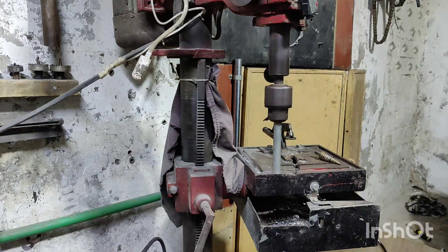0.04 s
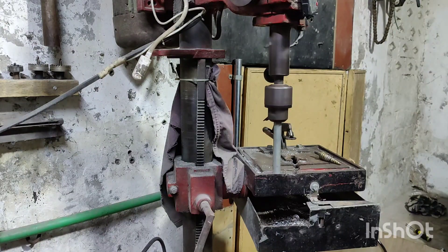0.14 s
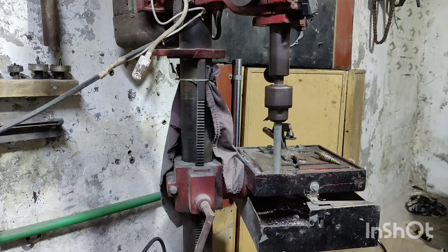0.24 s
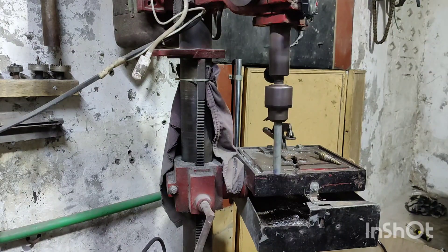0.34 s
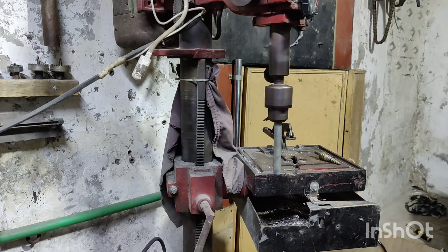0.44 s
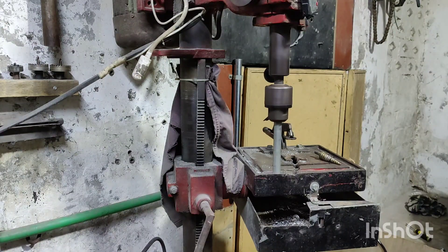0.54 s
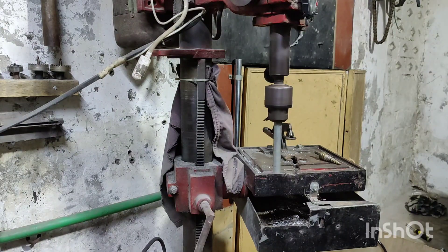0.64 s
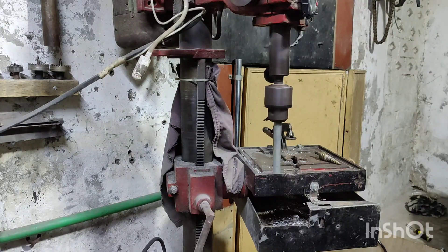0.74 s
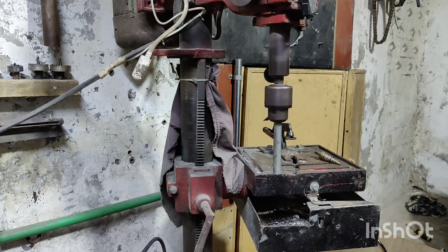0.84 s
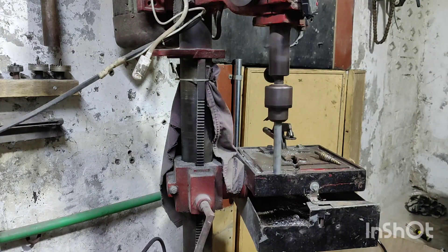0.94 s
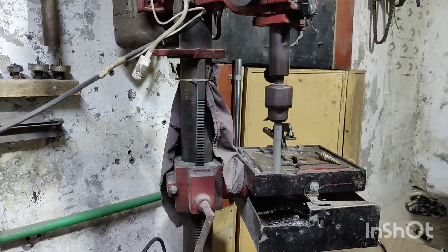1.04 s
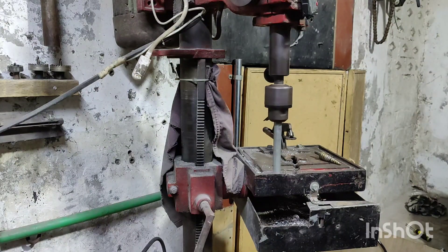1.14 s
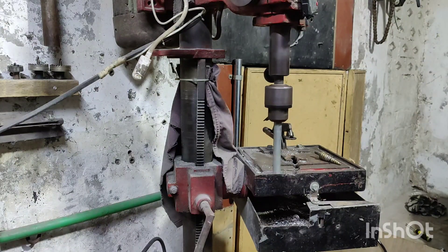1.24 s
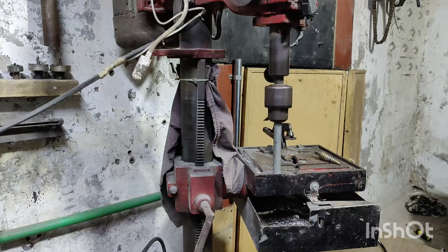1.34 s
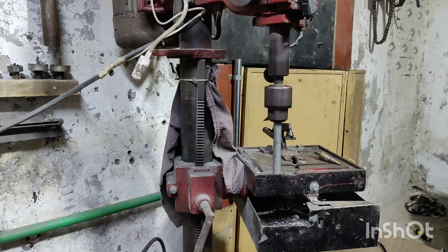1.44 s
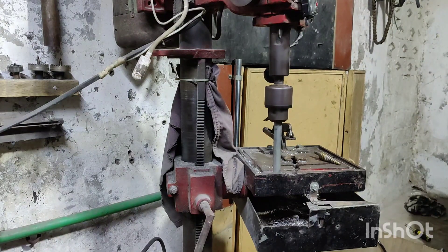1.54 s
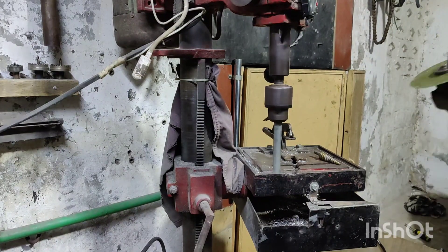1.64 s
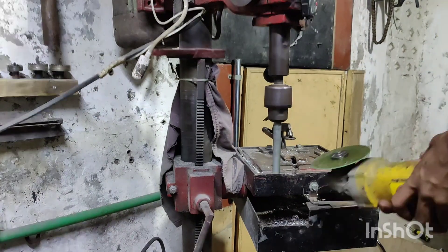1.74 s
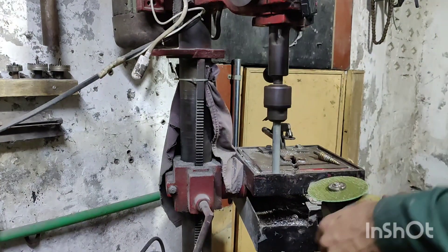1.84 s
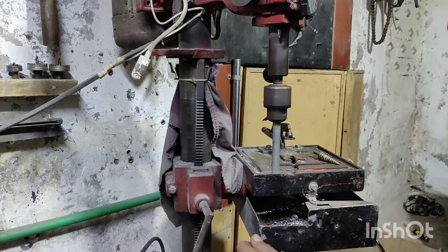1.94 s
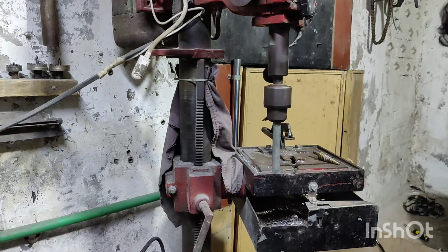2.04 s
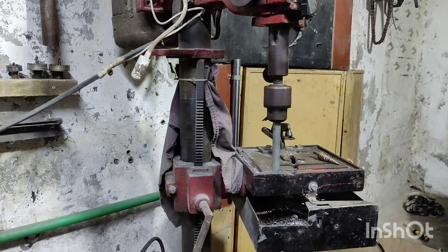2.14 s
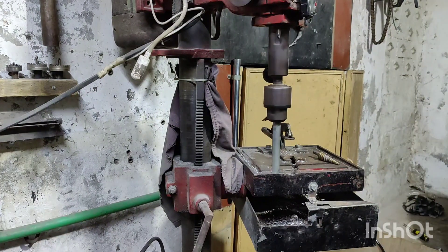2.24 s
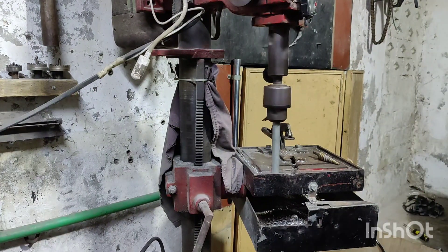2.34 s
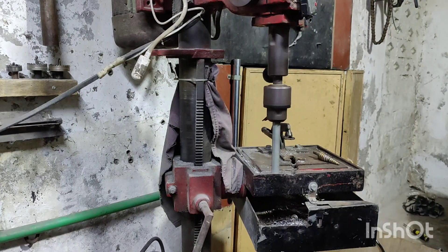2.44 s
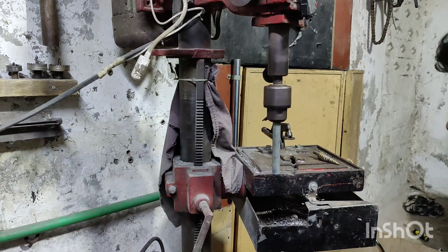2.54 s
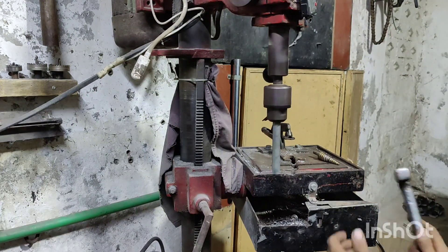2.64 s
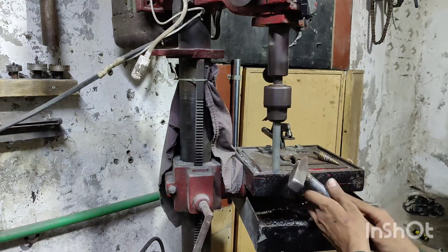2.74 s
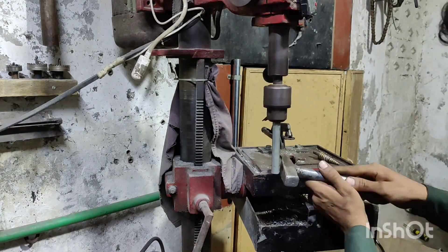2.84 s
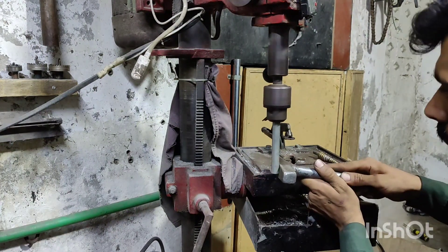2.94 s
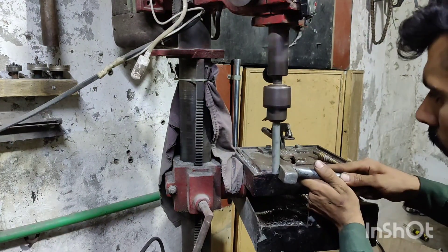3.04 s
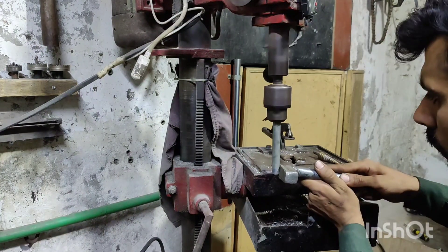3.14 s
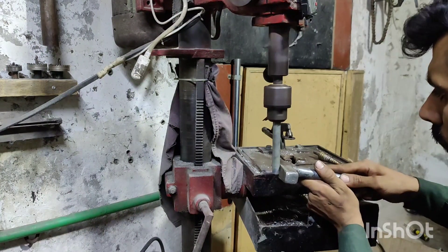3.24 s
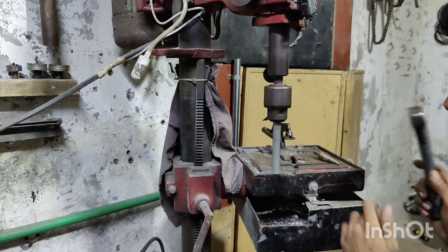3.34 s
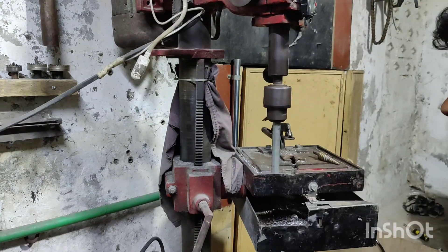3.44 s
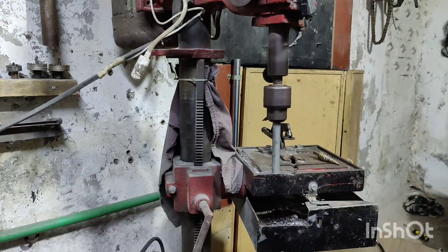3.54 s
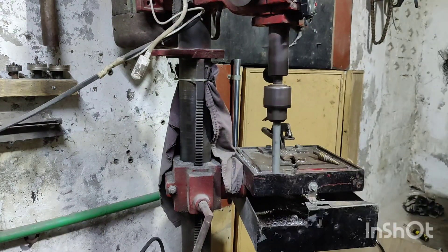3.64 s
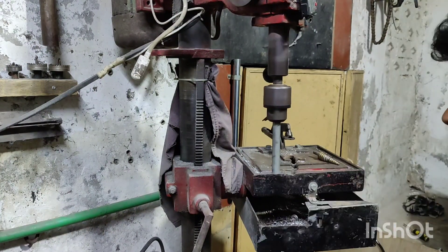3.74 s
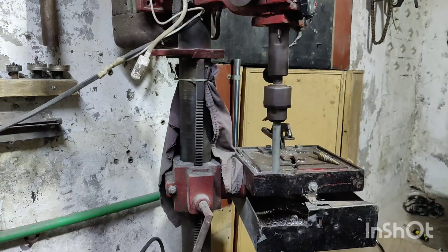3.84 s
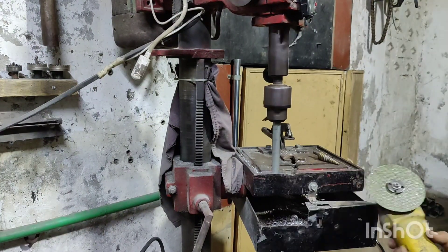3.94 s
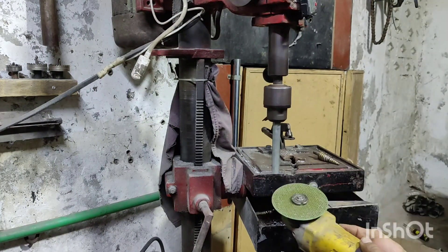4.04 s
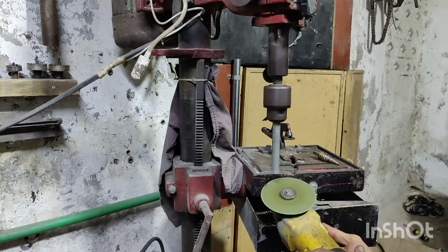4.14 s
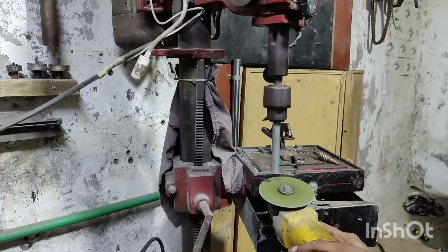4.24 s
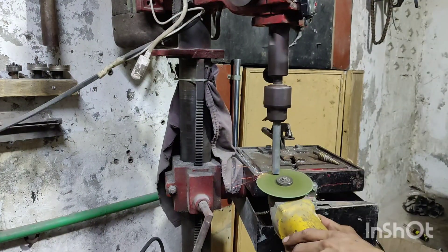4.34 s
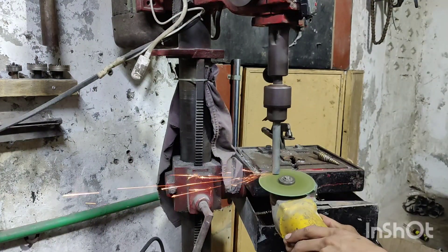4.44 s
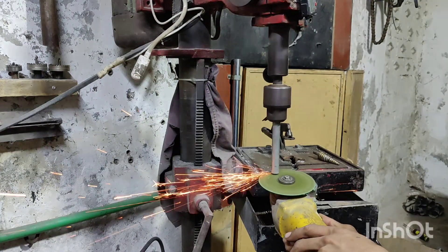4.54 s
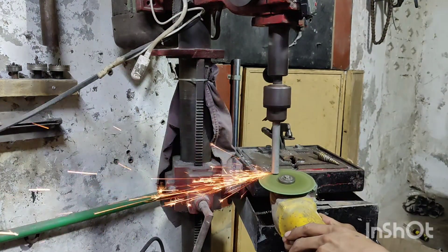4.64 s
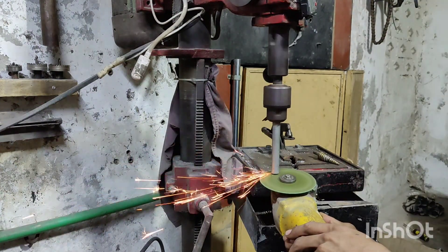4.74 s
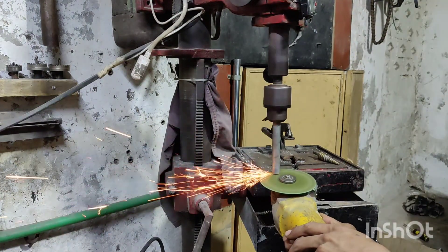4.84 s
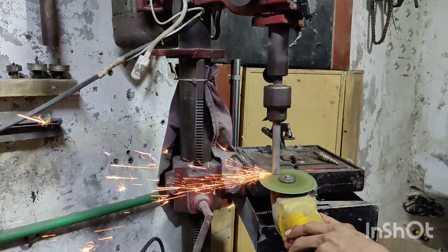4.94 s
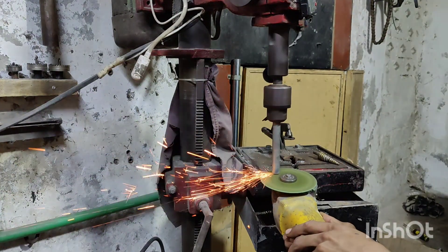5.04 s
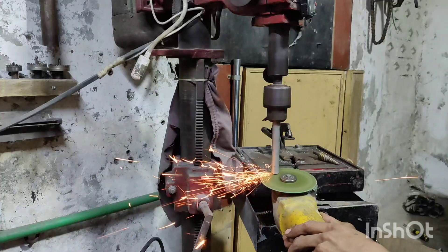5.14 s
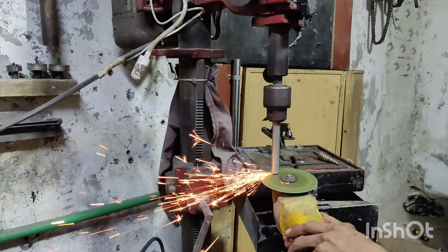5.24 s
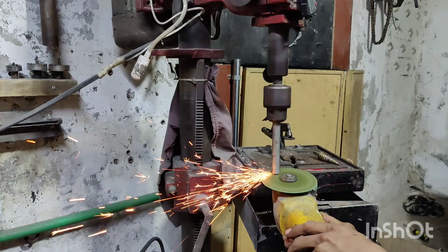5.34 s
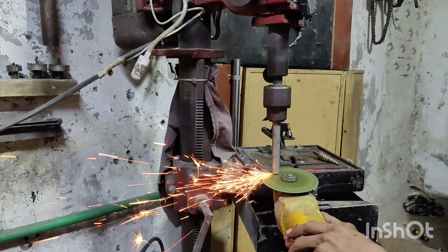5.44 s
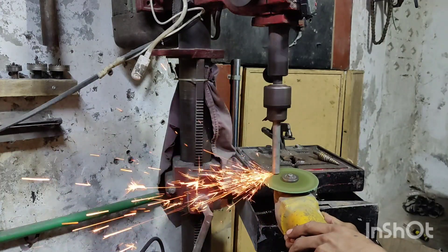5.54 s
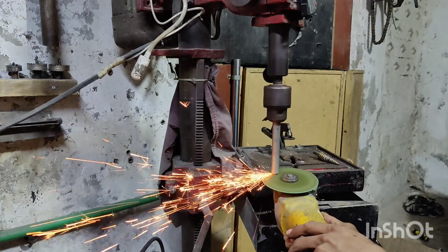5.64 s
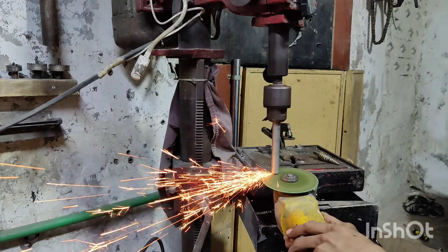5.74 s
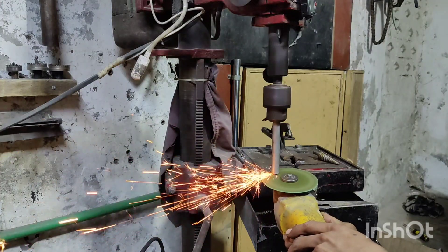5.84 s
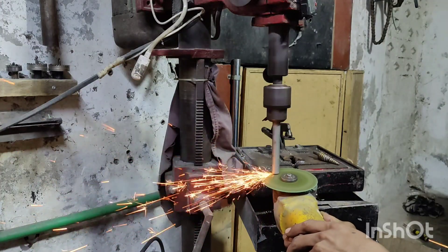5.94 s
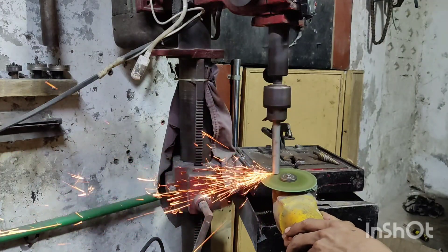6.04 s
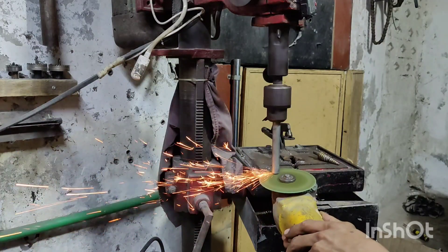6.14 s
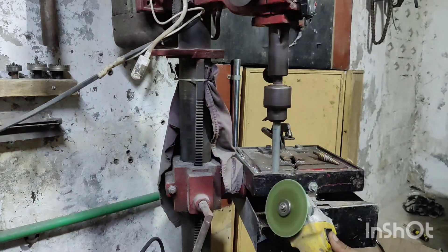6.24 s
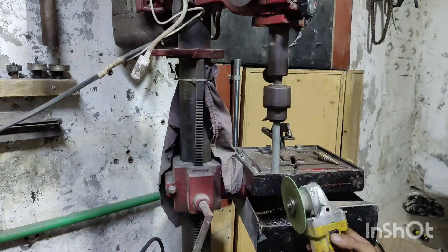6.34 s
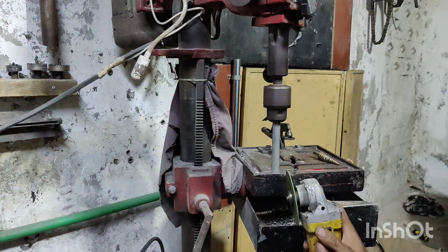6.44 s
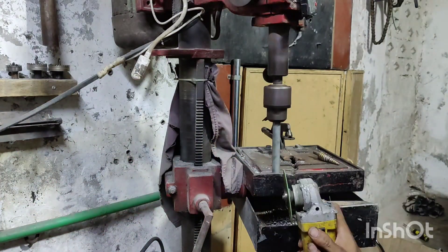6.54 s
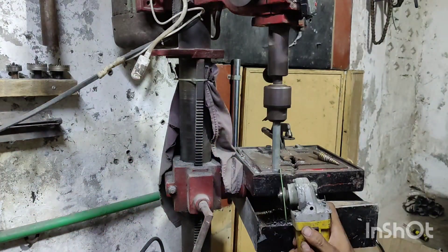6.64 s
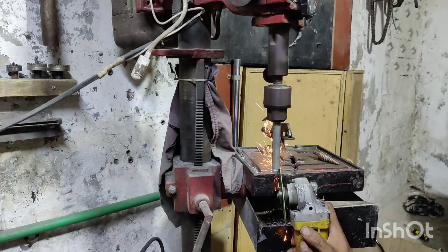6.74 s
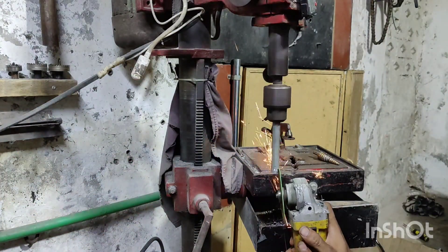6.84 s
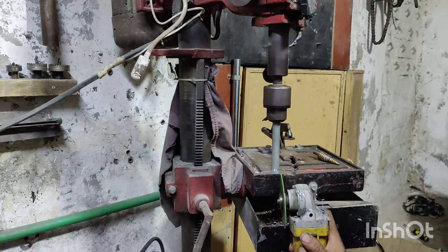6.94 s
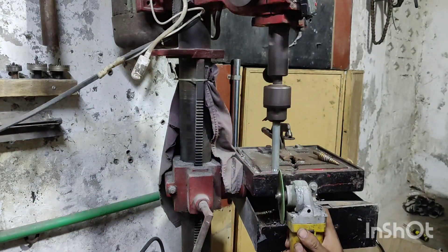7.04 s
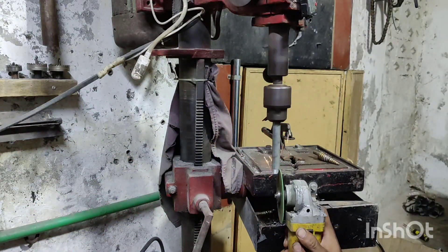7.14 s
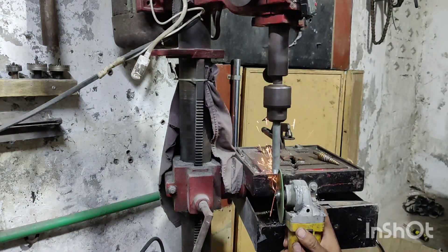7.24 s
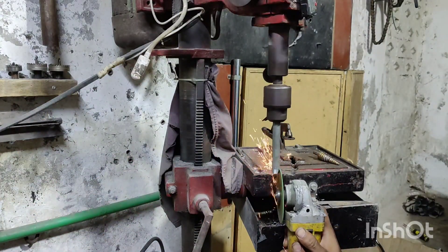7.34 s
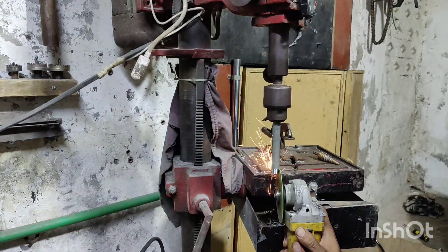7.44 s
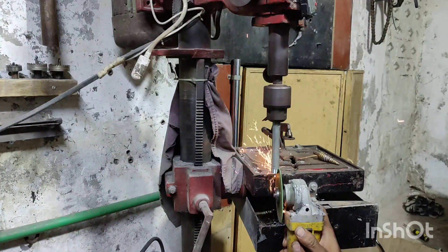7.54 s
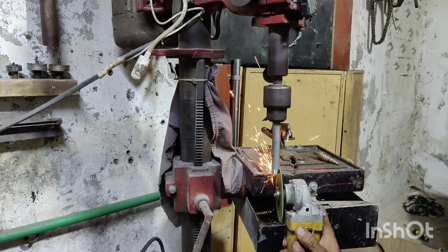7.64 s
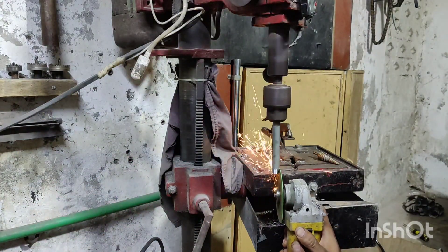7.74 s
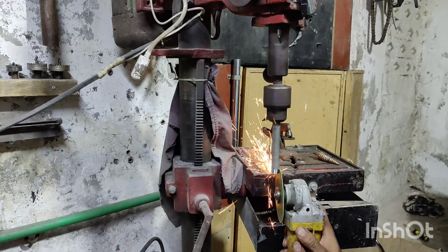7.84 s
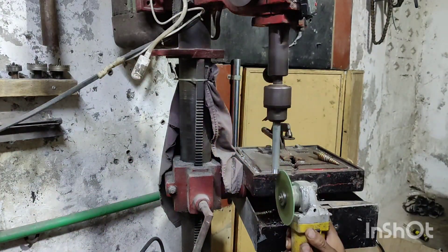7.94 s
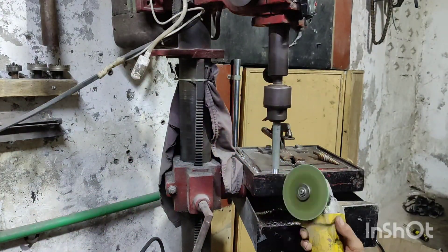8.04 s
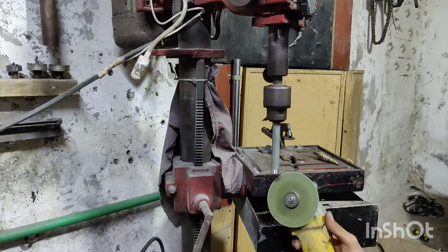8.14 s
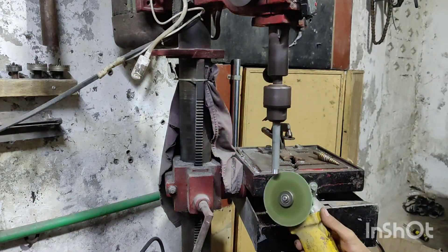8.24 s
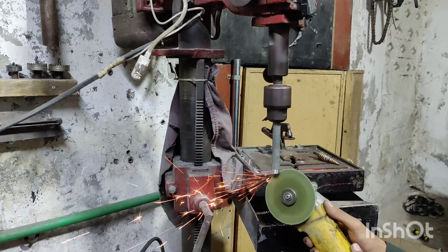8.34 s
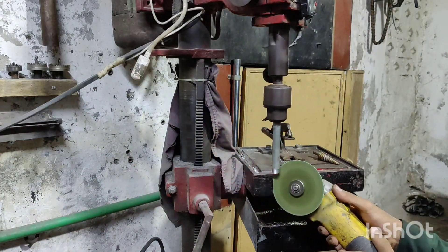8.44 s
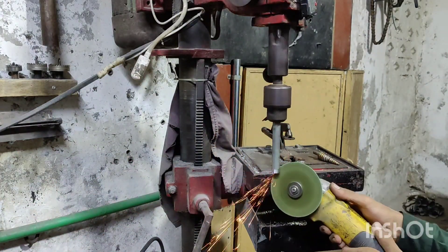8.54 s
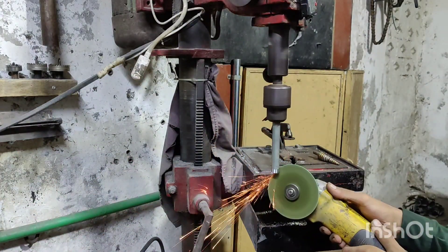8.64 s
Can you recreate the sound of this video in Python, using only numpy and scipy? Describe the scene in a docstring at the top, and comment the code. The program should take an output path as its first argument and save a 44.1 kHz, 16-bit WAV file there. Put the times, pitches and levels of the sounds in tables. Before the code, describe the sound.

Quiet belt-and-motor drone with scattered taps, one sharp metallic knock near 2.7 seconds and a few faint squeaks. A grinder snaps on abruptly, much louder, and bites steel in a long abrasive cut with wavering whines, ending in a short squeal. Slack gears rattle and the fan rushes, then several short rasping cuts whistle. Dry close room, wind puffs on the microphone, sound heavily to the right.

```python
"""An angle grinder snaps on and cuts a spinning steel rod: one long face cut, then short edge cuts.
Wheel speed sets the pitch of grit, chatter and whistles: grit repeats every turn, speed sags under load.
Between cuts the slack bevel gears rattle; the fan rushes and gusts off the wheel buffet the microphone.
Behind it a belt-driven drill press rumbles and hums; taps, knocks, brief narrow tones and a skid are heard.
The workshop is on the right; the left has a faint rumble, a differentiated trace of it and one thud."""
import sys
import numpy as np
from scipy import signal
from scipy.fft import rfft, irfft, next_fast_len
from scipy.io import wavfile
from scipy.ndimage import map_coordinates

SR = 44100
rng = np.random.default_rng(int(sys.argv[2]) if len(sys.argv) > 2 else 0)


def wav_record(signal):
    """Record a signal, one row per channel, as 16-bit PCM in the file named by sys.argv[1]."""
    frames = np.transpose(np.atleast_2d(signal))
    bounded = np.clip(frames, -1, 1)
    # unit amplitude maps onto the largest positive 16-bit level
    quanta = np.round(bounded * 32767).astype(np.int16)
    wavfile.write(sys.argv[1], SR, quanta)


N = 383669
TIME = np.arange(N) / SR

# Levels are those of the sources, before the room and output gain.
# cuts with the face of the wheel: (start [s], end [s], speed approached under load [turns/s], scrape [dB],
# hiss [dB], hiss swell [dB/s], gear rattle until the next cut [dB], rattle build-up [s])
FACE_CUTS = [(4.29, 6.2, 143.2, -20.5, -26.5, -1.5, -22, 0.16)]
# cuts with the edge of the wheel: columns as FACE_CUTS; no rattle follows the last
EDGE_CUTS = [(6.665, 6.959, 148.6, -29, -26.5, 7, -19, 0.012),
             (7.113, 7.942, 146.4, -27.5, -25.7, -1, -21, 0.005),
             (8.341, 8.397, 154.6, -24, -27, 0, -20.5, 0.006),
             (8.486, 8.507, 160.5, -25, -30, 0, -20.5, 0.0051),
             (8.525, 8.753, 152.3, -25, -29, 7, -21, .05)]
# chatter of wheel on rod, by tone family: (time [s], low whine [dB], main whine [dB], middle [dB],
# upper [dB], shrill [dB], treble [dB])
CHATTER_LEVELS = [(4.64, -70, -60, -45, -60, -45, -41), (4.77, -60, -30.5, -37, -42, -38, -51),
                  (4.82, -60, -50, -49, -52, -28, -46), (4.87, -60, -46, -46, -37, -34, -43),
                  (4.92, -60, -50, -41, -50, -39, -28), (5.02, -56, -42, -40, -36, -33, -32),
                  (5.06, -55, -27, -40, -29, -32, -21), (5.11, -48, -26.5, -38, -41, -36, -25.5),
                  (5.17, -38, -31, -31, -25, -31, -23), (5.23, -42, -30, -34, -33, -41, -24),
                  (5.28, -49, -27.5, -38, -24, -37, -26), (5.32, -42, -28.5, -33, -26, -33, -26),
                  (5.38, -44, -32.5, -32, -29, -39, -21.5), (5.44, -43, -34, -34, -24.5, -38, -21.5),
                  (5.5, -46, -27, -30, -27, -31, -25), (5.56, -47, -51, -39, -29, -36, -26),
                  (5.61, -46, -40, -32, -42, -38, -25), (5.67, -46, -27.5, -29, -31.5, -29, -24),
                  (5.72, -39, -26, -29, -23.5, -29, -26), (5.78, -52, -30.5, -29.5, -31.5, -34, -23),
                  (5.86, -55, -34, -31, -33, -33, -26), (5.9, -56, -26.5, -32, -28, -32, -29),
                  (5.97, -58, -31, -34, -31.5, -32, -29), (6.01, -60, -33.5, -38, -33, -22, -29),
                  (6.09, -62, -37, -46, -30, -29, -30), (6.17, -67, -42, -31, -40, -31, -36)]
# chatter tones, one list per family in that order: (multiple of wheel speed [-], relative level [dB])
CHATTER_ORDERS = [
    [(7, 0)],
    [(13, -10), (14, 0), (15, -10), (16, -11), (17, -16), (18, -22)],
    [(19, -16), (20, 0), (21, -7), (22, -18), (23, -13)],
    [(24, -19), (25, -14), (26, -12), (27, 0), (28, -18), (29, -15), (30, -19)],
    [(36, -5), (37, -6), (38, -1), (39, 0), (40, -8), (41, -4), (42, -11)],
    [(32, -14), (33, -17), (34, -7), (35, -3), (43, -6), (44, -8), (45, 0), (46, -5), (47, -3), (48, -7),
     (49, 0), (50, -2), (52, -9), (53, -10), (54, -3), (56, -11), (57, -12), (59, -14), (63, -9), (65, -9),
     (67, -10), (69, -9), (75, -14), (78, -14), (80, -11), (90, -9), (92, -9), (104, -14), (106, -12)],
]
# wheel flexing in the edge cuts: (multiple of wheel speed [-], relative level [dB])
FLEX_ORDERS = [(10, -2), (11, -3), (12, 0), (13, -8), (15, -8), (36, -2), (38, -1), (40, -3), (41, -4),
               (47, -1)]
# squeal as the face slides off the rod: (multiple of wheel speed [-], relative level [dB])
SQUEAL_ORDERS = [(13, -1), (15, 0), (20, -6), (21, -2), (25, -11)]
# wheel singing in the edge cuts: (start [s], end [s], level [dB])
WHISTLES = [(6.67, 6.84, -42), (6.76, 6.9, -40), (6.74, 6.95, -30.5), (6.82, 6.95, -27.5),
            (7.112, 7.253, -36), (7.32, 7.922, -46), (7.51, 7.848, -44), (7.36, 7.72, -44),
            (7.55, 7.93, -28.5), (8.56, 8.64, -29.5), (8.65, 8.7, -25)]
# tones of each whistle, one list per row: (multiple of wheel speed [-], relative level [dB])
WHISTLE_ORDERS = [
    [(11, 0)],
    [(9, 0)],
    [(82, -2), (83, -3), (85, 0), (86, -2)],
    [(94, -8), (95, 0), (96, -2)],
    [(11, 0)],
    [(10, 0), (12, -1)],
    [(4, 0)],
    [(31, 0)],
    [(36, 0), (38, -2), (40, -3), (47, -2), (79, -7), (81, -5), (85, -2), (87, 0), (89, -2), (96, -6),
     (100, -6)],
    [(13, 0)],
    [(13, -6), (36, 0)],
]
# draught of the wheel sweeping the microphone: (start [s], end [s], rush [dB], buffeting [dB])
GUSTS = [(4.301, 5.14, -27, -35), (5.306, 5.435, -32, -42.5), (5.5, 5.608, -29, -36.5),
         (6.223, 6.647, -52, -45), (6.72, 7.097, -36, -41.5), (7.41, 7.874, -37.5, -41.5),
         (7.946, 8.516, -26.5, -38)]

# spectrum of the clatter at switch-on: (frequency [Hz], density [dB])
START_COLOUR = [(180, -55), (300, -27), (411, -9), (553, -20), (794, -2), (985, -3), (1260, -5),
                (1970, -3.5), (3180, -2), (3810, -6), (6680, 0.5), (8840, -15), (15500, -20)]
# spectrum of the slack gears: (frequency [Hz], density [dB])
GEAR_COLOUR = [(290, -23), (500, -6.5), (561, -21), (758, -1), (1170, -8), (1240, -3.5), (1470, -3.5),
               (2330, -1.5), (2500, 0), (3060, -3), (3960, 0), (5670, 0.5), (6740, 6.5), (7600, 2.5),
               (9240, -10), (15500, -9)]
# spectrum of the face scrape: (frequency [Hz], density [dB])
FACE_COLOUR = [(900, -45), (1900, -10.5), (2550, -1), (3100, -6), (3900, -1), (4450, -6.5), (5400, -2),
               (7000, 4.5), (8700, -8.5), (9600, -8), (10400, -6.5), (11500, -24), (15500, -3.5)]
# spectrum of the edge scrape: (frequency [Hz], density [dB])
EDGE_COLOUR = [(900, -25), (1800, -8), (2800, -7), (4700, -6.5), (5500, 0.5), (7000, 1), (8300, -5),
               (10500, -14), (12000, -19), (15500, -8.5)]
# spectrum of grit tearing off chips: (frequency [Hz], density [dB])
HISS_COLOUR = [(8000, -21.5), (11000, -9), (12000, -3.5), (13200, -2.5), (14200, -4.5), (15200, -1)]
# spectrum of the air rush: (frequency [Hz], density [dB])
RUSH_COLOUR = [(200, -8), (500, -3.5), (900, 1.5), (1500, 0.5), (3500, 0), (7000, -0.5), (15000, -31)]
# spectrum of air buffeting the microphone: (frequency [Hz], density [dB])
BUFFET_COLOUR = [(20, -25), (60, -2.5), (150, -1), (350, -1.5), (600, -6.5), (1500, -39)]
# spectrum of the press rumble: (frequency [Hz], density [dB])
PRESS_COLOUR = [(20, -14), (65, 1), (105, -8), (220, 2), (350, -1), (480, -3), (600, -8), (1000, -14.5),
                (1700, -16), (2250, -19.5), (3200, -23.5), (5600, -31), (6500, -22.5), (7300, -19),
                (8200, -34.5), (10000, -39.5), (13500, -45.5), (15500, -57)]

# hum of the press: (frequency [Hz], half-width at half amplitude [Hz], level [dB])
PRESS_HUM = [(142.2, 8.1, -50), (207.6, 6.7, -54.5), (254.5, 8.8, -49.5), (444.6, 18.6, -50.5),
             (644, 9, -61.5), (2200, 140, -61)]
# modes of the steel table and tools: (frequency [Hz], relative level [dB], t60 [s])
STEEL_MODES = [(140, 9, 0.12), (443, 14, 0.08), (838, 10.5, 0.07), (970, 11, 0.097), (1145, 18.5, 0.03),
               (1900, 9.5, 0.11), (2390, 5, 0.11), (2500, -16, 0.11), (2870, -18, 0.059),
               (3470, -26, 0.017), (5150, -13, 0.026), (6660, -7, 0.085), (5630, -4, 0.08), (6900, -7, .05),
               (9300, -9, 0.072), (12300, -6, 0.073)]
# taps and knocks: (time [s], peak [dB], centre [Hz], spread [octaves], crack [dB re 4], crack decay [s])
KNOCKS = [(0.019, -28.5, 252, 0.68, 26, 0.054), (0.111, -29.5, 220, 0.87, 1, .02),
          (0.358, -37.5, 3000, 0.78, 4, 0.017), (0.712, -34.5, 4700, 0.56, 10, 0.012),
          (1.15, -38, 4300, 0.59, 7, 0.027), (1.295, -32, 160, 0.36, -1, .02),
          (1.484, -44, 7000, 1.2, -2, .012), (1.752, -38.5, 7440, 0.9, 4, 0.023),
          (2.425, -33, 5440, 0.46, 12, 0.017), (2.43, -30.5, 1080, 0.86, 10, 0.02),
          (2.446, -44, 11500, 0.4, 10, .01), (2.51, -41, 5200, 0.31, 4, 0.0055),
          (2.704, -19.5, 2940, 0.58, 20, 0.0026), (2.704, -34, 1150, 0.62, 16, .008),
          (2.721, -38, 2400, 0.55, 20, .005), (3.266, -26, 4940, 0.064, 14, 0.0041),
          (3.585, -23, 430, 1.08, 9, 0.021), (4.1, -37.5, 7900, 0.26, -17, .01),
          (4.14, -14.5, 2800, 1, 11, 0.0089)]
# short narrow tones, squeaks, then rings and whines of the grinder: (start [s], length [s],
# frequency [Hz], half-width [Hz], level [dB], glide [Hz/s], waver [share of pitch])
BRIEF_TONES = [(0.673, 0.39, 4260, 70, -59.5, 4, .002), (1.729, 0.077, 655, 18, -40, 0, 0.025),
               (2.96, 0.37, 4920, 50, -65, 4, .005), (3.23, 0.08, 4280, 60, -58, 0, 0),
               (3.305, 0.098, 700, 20, -43, 500, 0.019), (4.147, 0.041, 2000, 35, -29, 0, 0),
               (4.17, 0.027, 3840, 67, -22, 0, 0), (4.215, 0.032, 980, 60, -28, 0, 0.0015),
               (4.255, 0.028, 2160, 45, -28.5, 0, 0), (6.376, 0.24, 1267, 14, -45, 0, 0),
               (6.95, 0.21, 1215, 4, -39, 260, 0), (6.99, 0.12, 2440, 14, -38, 400, 0.0047),
               (8.02, 0.26, 2453, 12.1, -35, 477, 0.0082), (8.06, 0.16, 3978, 35, -32.5, -300, .006),
               (8.39, 0.11, 4150, 60, -35, 600, .004), (8.341, 0.031, 2200, 50, -26.5, 0, 0.00025),
               (8.5, 0.12, 5470, 35, -27.5, 0, 0.0011), (8.51, 0.13, 1880, 20, -36, 0, 0.0008),
               (8.625, 0.083, 5465, 35, -25.5, 0, 0)]
# partials of a tool skidding on the table: (frequency [Hz], half-width [Hz], level [dB])
SKID_PARTIALS = [(1895, 32, -40.5), (4040, 100, -56), (5900, 370, -41), (9600, 200, -49), (11600, 500, -50)]

# resonances of wheel and rod, face on: (frequency [Hz], width [Hz], boost [dB])
FACE_RING = [(1980, 130, 10.5), (2580, 180, -10), (4580, 330, -5), (4900, 150, 8.5), (5610, 260, 5.5),
             (6500, 270, 3.5), (8900, 300, 2), (9330, 130, 10), (11270, 360, 7.5), (13300, 400, 5)]
# resonances of wheel and rod, edge on: (frequency [Hz], width [Hz], boost [dB])
EDGE_RING = [(1473, 67, 12.5), (1860, 140, 11.5), (2205, 110, 6), (4760, 110, 5), (5290, 110, 6),
             (5400, 56, 3.5), (5900, 510, 5), (6570, 82, 4), (6880, 100, 6.5), (7640, 200, 5),
             (9300, 190, 6.5), (9780, 180, -2), (13200, 250, -1), (13600, 150, 4), (15050, 250, 1)]
# resonances of wheel guard and gear case: (frequency [Hz], width [Hz], boost [dB])
GUARD_RING = [(1247, 28, 4), (1257, 19, 7), (1690, 64, 0.5), (2490, 84, 1), (3390, 78, 3.5),
              (4040, 260, 1.5), (5440, 110, 3), (6200, 150, 2)]
# wheel modes that lift the flex tones: (frequency [Hz], width [Hz], boost [dB])
FLEX_RING = [(1800, 52, 3.5), (1519, 63, 4)]
# valleys in the noise while the chatter is loud: (frequency [Hz], width [Hz], boost [dB])
VALLEYS = [(4440, 300, -24), (2580, 150, -8)]

SWITCH_ON_S, FREE_TURNS_PER_S = 4.14, 176.2
# time constants of the wheel speed
RUN_UP_S, RECOVER_S, FACE_SAG_S, EDGE_SAG_S = .066, .135, .195, .245
PICK_UP_TURNS_PER_S, PICK_UP_S = 6, .1  # extra speed around the end of the face cut, as the hand eases out
BITE_DB, BITE_S = -6.5, 0.37  # face scrape starts softer and grows as it bites in
EASE_DB, EASE_S = -4.5, 0.024  # hand eases off before the wheel lifts
SLACK_DB = -4.5  # rattle starts this much softer as the load comes off
RATTLE_DB_PER_TURN_PER_S = 0.21
KICK_DB, KICK_DB_PER_S = -26.5, 58  # clatter at switch-on and its growth
GUST_ATTACK_S, GUST_RELEASE_S = 0.014, 0.038
FAN_DB, FACE_RUSH_DB = -31.5, -4  # fan at free speed; change of the rush during the face cut
SQUEAL_START_S, SQUEAL_END_S, SQUEAL_DB = 6.105, 6.155, -20
FLEX_DB = -15.5  # re edge scrape
VALLEY_FULL_DB = -22.5  # chatter level at which the valleys are deepest
PRESS_RUMBLE_DB = -43
SKID_S, SKID_LENGTH_S = 3.778, 0.044
BUMP_S = 1.495
WALL_T60_S = 0.17
OUTPUT_DB = 5
FLUTTER_HZ = SR / 1024
TOP_HZ = 15450


def undb(db):
    """Decibels to gain."""
    return 10 ** (np.asarray(db) / 20)


def unit(x):
    """Scale to rms 1."""
    return x / np.sqrt(np.mean(x ** 2) + 1e-20)


def curve(rows, axis=1):
    """One table column, joined by straight lines in time."""
    rows = np.array(rows)
    return np.interp(TIME, rows[:, 0], rows[:, axis])


def gate(start_s, end_s, fade_s):
    """1 between two times, with short ramps centred on them."""
    inside_s = np.minimum(TIME - start_s, end_s - TIME)
    return np.sqrt(np.clip(inside_s / fade_s + .5, 0, 1))


def swell(start_s, end_s, attack_s, release_s):
    """Exponential build-up from the start and decay after the end."""
    age_s = np.clip(TIME - start_s, 0, end_s - start_s)
    since_end_s = np.maximum(TIME - end_s, 0)
    return (1 - np.exp(-age_s / attack_s)) * np.exp(-since_end_s / release_s)


def walk(rate_hz, t=TIME):
    """Random wander with rate_hz new targets per second, spread near 1."""
    steps = rng.standard_normal(N // 8)
    return 1.2 * np.interp(t * rate_hz, np.arange(len(steps)), steps)


def shape(x, response):
    """Filter by a gain as a function of frequency; rms 1."""
    size = next_fast_len(len(x), True)
    hz = np.maximum(np.arange(size // 2 + 1) * SR / size, 1)
    return unit(irfft(rfft(x, size) * response(hz), size)[:len(x)])


def colour(x, points):
    """Filter by (frequency [Hz], gain [dB]) points on a log-frequency axis; rms 1."""
    hz, db = np.transpose(points)
    return shape(x, lambda f: undb(np.interp(np.log(f), np.log(hz), db)))


def resonance(hz, half_width_hz, size):
    """A resonance driven by noise; rms 1."""
    return shape(rng.standard_normal(size), lambda f: 1 / (1 + ((f - hz) / half_width_hz) ** 2))


def ring(x, modes):
    """Boost or cut the sound around a few frequencies; rms 1."""
    def response(f):
        return undb(sum(db / (1 + (2 * (f - hz) / width_hz) ** 2) for hz, width_hz, db in modes))
    return shape(x, response)


def bump(hz, decay_s, db):
    """A short, low thud through the microphone body: a decaying sine."""
    t = np.maximum(TIME - BUMP_S, 0)
    return undb(db) * np.sin(2 * np.pi * hz * t) * np.exp(-t / decay_s)


def workshop(x, wet_db):
    """Close bare walls add a short tail: convolution with decaying noise."""
    t = np.arange(SR // 3) / SR
    tail = rng.standard_normal(len(t)) * undb(-60 * t / WALL_T60_S) * (t > .005)
    return x + undb(wet_db) * signal.fftconvolve(x, tail / np.linalg.norm(tail))[:N]


def drill_press():
    """Motor, belt and bearings rumble and ring the cast frame: coloured noise plus narrow hums."""
    rough = rng.standard_normal(N) * undb(1.66 * walk(45))
    rumble = colour(rough, PRESS_COLOUR) * undb(PRESS_RUMBLE_DB + 0.15 * walk(3.6))
    hum = sum(undb(db) * resonance(hz, half_width_hz, N) for hz, half_width_hz, db in PRESS_HUM)
    return rumble + hum


def knock(peak_db, centre_hz, spread_oct, crack_db, crack_decay_s, size):
    """A blow rings the steel modes near its own pitch, with a short noise crack."""
    t = np.arange(size) / SR
    modes = sum(undb(db) * np.sin(2 * np.pi * hz * t + rng.uniform(0, 2 * np.pi)) * undb(-60 * t / t60_s)
                for hz, db, t60_s in STEEL_MODES)
    crack = 4 * undb(crack_db) * rng.standard_normal(size) * np.exp(-t / crack_decay_s)
    padded = np.pad(modes + crack, (size, 0))  # room for the filter to spread ahead of the blow
    blow = shape(padded, lambda f: np.exp(-.5 * (np.log2(f / centre_hz) / spread_oct) ** 2))
    return undb(peak_db) * blow / np.abs(blow).max()


def brief_tone(length_s, hz, half_width_hz, db, glide_hz_per_s=0, waver=0):
    """A narrow noise-driven ring that fades in and out, read at a sliding and wavering rate."""
    t = TIME[:int(length_s * SR)]
    pitch = 1 + glide_hz_per_s * (t - length_s / 2) / hz + waver * walk(44.5)[:len(t)]
    narrow = resonance(hz, half_width_hz, size=32768)
    sound = unit(map_coordinates(narrow, [np.cumsum(pitch)], mode="wrap"))
    return undb(db) * sound * signal.get_window(("tukey", min(1, .08 / length_s)), len(t))


def knocks_and_tones(size=16384):
    """Taps, knocks, brief tones and a skid."""
    out = np.zeros(N + SR)  # leads TIME by size samples
    for start_s, *row in KNOCKS:
        out[int(start_s * SR):][:2 * size] += knock(*row, size)
    skid = [(SKID_S, SKID_LENGTH_S, *partial) for partial in SKID_PARTIALS]
    for start_s, *row in BRIEF_TONES + skid:
        sound = brief_tone(*row)
        out[size + int(start_s * SR):][:len(sound)] += sound
    return out[size:][:N]


def wheel_speed():
    """Turns per second: run-up, sag towards loaded speed in each cut, recovery after it."""
    speed = np.full(N, FREE_TURNS_PER_S)
    for cuts, sag_s in (FACE_CUTS, FACE_SAG_S), (EDGE_CUTS, EDGE_SAG_S):
        for start_s, end_s, loaded, *_ in cuts:
            for from_s, goal, lag_s in (start_s, loaded, sag_s), (end_s, FREE_TURNS_PER_S, RECOVER_S):
                offset = np.interp(from_s, TIME, speed) - goal
                approach = goal + offset * np.exp(-np.abs(TIME - from_s) / lag_s)
                speed = np.where(TIME < from_s, speed, approach)
    face_end_s = FACE_CUTS[0][1]
    speed = speed + PICK_UP_TURNS_PER_S * np.exp(-np.abs(TIME - face_end_s) / PICK_UP_S)
    return speed * (1 - np.exp(-np.maximum(TIME - SWITCH_ON_S, 0) / RUN_UP_S))


def rim(turns, memory, lasting=0, size=640, count=128):
    """Roughness round a wheel, read once a turn: wear renews grit, the wheel's own unevenness lasts."""
    keep = np.clip(memory, 0, .995)
    fresh = rng.standard_normal((int(turns[-1]) + 2, count, 2)) @ np.array([1, 1j])
    grit = signal.lfilter([np.sqrt((1 - keep ** 2) / 2)], [1, -keep], fresh, axis=0)  # turn to turn
    uneven = lasting * np.exp(2j * np.pi * rng.random(count))
    profile = irfft(grit + uneven, size, axis=1).ravel()
    return unit(map_coordinates(profile, [turns * size], order=1))


def tones(turns, orders, slip_turns, swell_db, span_s):
    """Multiples of wheel speed, each swelling and trembling; uneven rotation blurs the high ones."""
    heard = (TIME > span_s[0] - .1) & (TIME < span_s[1] + .1)
    t = TIME[heard]
    angle = 2 * np.pi * (turns[heard] + slip_turns * walk(110, t))
    mix = 0
    for order, db in orders:
        level = undb(db + swell_db * walk(7, t) + walk(25, t))
        mix = mix + level * np.sin(order * angle + rng.uniform(0, 2 * np.pi))
    out = np.zeros(N)
    out[heard] = unit(mix)
    return out


def draught(speed):
    """Fan rush grows with wheel speed; gusts off the wheel add rush and buffet the microphone."""
    face_rush_db = FACE_RUSH_DB * gate(*FACE_CUTS[0][:2], fade_s=0.1)
    rush = undb(FAN_DB + face_rush_db) * speed / FREE_TURNS_PER_S
    buffet = 0
    for start_s, end_s, rush_db, buffet_db in GUSTS:
        gust = swell(start_s, end_s, GUST_ATTACK_S, GUST_RELEASE_S)
        rush = np.hypot(rush, undb(rush_db) * gust)
        buffet = buffet + undb(buffet_db) * gust
    rushing = colour(rng.standard_normal(N), RUSH_COLOUR) * rush
    buffeting = colour(rng.standard_normal(N), BUFFET_COLOUR) * buffet * undb(walk(25))
    return rushing + buffeting


def gears(turns, speed):
    """Unloaded teeth clatter in their backlash and ring the guard; the start kick is coarser noise."""
    cuts = FACE_CUTS + EDGE_CUTS
    first_touch_s = cuts[0][0]
    kick_db = KICK_DB + KICK_DB_PER_S * (np.minimum(TIME, first_touch_s) - SWITCH_ON_S)
    kick = undb(kick_db) * gate(SWITCH_ON_S + 0.0011, first_touch_s - .008, fade_s=0.006)
    start = colour(rng.standard_normal(N) * undb(0.92 * walk(400)), START_COLOUR) * kick

    slack = 0
    for (_, lift_s, *_, rattle_db, build_s), following in zip(cuts, cuts[1:]):
        settling = np.exp(-np.maximum(TIME - lift_s, 0) / build_s)
        slack = slack + undb(rattle_db + SLACK_DB * settling) * gate(lift_s, following[0], fade_s=0.0072)
    clatter = rim(turns, memory=0.18) * undb(0.28 * walk(500) + 0.5 * walk(40))
    rattle = ring(colour(clatter, GEAR_COLOUR), GUARD_RING)
    return start + rattle * slack * undb(RATTLE_DB_PER_TURN_PER_S * (speed - FREE_TURNS_PER_S))


def whistling(turns):
    """Wheel flex and a few proud grains repeat once a turn and sing at multiples of wheel speed."""
    out = 0
    for (start_s, end_s, db), orders in zip(WHISTLES, WHISTLE_ORDERS):
        song = tones(turns, orders, slip_turns=.0011, swell_db=1.5, span_s=(start_s, end_s))
        out = out + undb(db) * swell(start_s, end_s, attack_s=.018, release_s=.012) * song
    return out


def chattering(turns):
    """Wheel bounces on rod: tone families swell in turn, then squeal; returns sound and bounce."""
    start_s, end_s = FACE_CUTS[0][:2]
    levels_db = np.array([curve(CHATTER_LEVELS, axis=k + 1) for k in range(len(CHATTER_ORDERS))])
    levels = undb(levels_db) * gate(start_s, end_s - .03, fade_s=0.063)
    whine = sum(level * tones(turns, family, slip_turns=.0006, swell_db=1.2, span_s=(start_s, end_s))
                for level, family in zip(levels, CHATTER_ORDERS))
    squeal_span_s = (SQUEAL_START_S, SQUEAL_END_S)
    squeal = tones(turns, SQUEAL_ORDERS, slip_turns=0.0029, swell_db=-1.5, span_s=squeal_span_s)
    squeal = squeal * swell(*squeal_span_s, attack_s=0.027, release_s=0.0053)
    return whine + undb(SQUEAL_DB) * squeal, np.linalg.norm(levels, axis=0)


def face_scrape(turns, bounce):
    """Grit of the face rings wheel and rod; a bouncing wheel scrapes less."""
    grit = rim(turns, memory=0.49, lasting=0.081) * undb(0.38 * walk(700))
    return ring(colour(grit, FACE_COLOUR), FACE_RING) / (1 + 12 * bounce)


def edge_scrape(turns):
    """Grit of the edge rings wheel and rod; flex tones are loudest near a wheel mode."""
    grit = rim(turns, memory=0.54, lasting=0.59) * undb(1.4 * walk(760))
    span_s = (EDGE_CUTS[0][0], EDGE_CUTS[-1][1])
    flex = tones(turns, FLEX_ORDERS, slip_turns=.0009, swell_db=1.6, span_s=span_s)
    return ring(colour(grit, EDGE_COLOUR), EDGE_RING) + undb(FLEX_DB) * ring(flex, FLEX_RING)


def grinding(turns, cuts, body, modes, bite_db=0):
    """Each cut gates the scrape and the fine hiss of grit tearing off chips; the hand wavers."""
    grit = rim(turns, memory=0.52, lasting=0.31) * undb(1.3 * walk(900))
    hiss = ring(colour(grit, HISS_COLOUR), modes)
    hand_db = 0.86 * walk(14)
    out = 0
    for start_s, end_s, _, scrape_db, hiss_db, swell_db_per_s, *_ in cuts:
        age_s = np.clip(TIME - start_s, 0, end_s - start_s)
        biting_db = bite_db * np.exp(-age_s / BITE_S)
        easing_db = EASE_DB * np.exp(-np.maximum(end_s - TIME, 0) / EASE_S)
        scrape = body * undb(scrape_db + biting_db + easing_db + hand_db)
        chips = hiss * undb(hiss_db + swell_db_per_s * age_s + walk(25))
        out = out + gate(start_s, end_s, fade_s=0.014) * (scrape + chips)
    return out


def grinder():
    """Wheel speed sets the pitch of grit, chatter and gears; the wheel also throws air."""
    speed = wheel_speed()
    turns = np.cumsum(speed + 0.15 * walk(9)) / SR
    chatter, bounce = chattering(turns)
    face_cuts = grinding(turns, FACE_CUTS, face_scrape(turns, bounce), FACE_RING, BITE_DB)
    edge_cuts = grinding(turns, EDGE_CUTS, edge_scrape(turns), EDGE_RING)
    noise = gears(turns, speed) + face_cuts + edge_cuts + draught(speed)
    # noise darkens around 4.4 and 2.6 kHz while the chatter is loud
    hollow = np.minimum(bounce / undb(VALLEY_FULL_DB), 1) ** 4
    noise = (1 - hollow) * noise + hollow * ring(noise, VALLEYS) * np.std(noise)
    return noise + chatter + whistling(turns)


def scene():
    """Right: the workshop; left: faint rumble, a differentiated trace of the workshop, the thud."""
    press = drill_press() * undb(-4 * gate(4.4, np.inf, fade_s=0.18))  # recedes under the grinder
    air = press + workshop(knocks_and_tones() + grinder(), wet_db=-14.0)
    leak = undb(-54.0) * np.diff(air, prepend=0)
    rumble_colour = [(30, 18), (150, 5), (500, -23.5), (2000, -19.0), (15000, -46)]  # (Hz, dB)
    rumble = undb(-64.0) * colour(rng.standard_normal(N), rumble_colour)
    thud = bump(hz=108, decay_s=0.01, db=-22)
    return np.array([leak + rumble + thud, undb(OUTPUT_DB) * air + undb(-28) * thud])


def record(dry):
    """The level flutters slightly and fast; the highest peaks are rounded and the top is cut."""
    x = dry * undb(1.1 * np.cos(2 * np.pi * (FLUTTER_HZ * TIME + 1 / 7)))
    rounded = x / (1 + (x / .85) ** 4) ** .25
    return signal.sosfilt(signal.ellip(12, .1, 80, TOP_HZ, fs=SR, output="sos"), rounded)


dry = scene()
out = record(dry)
wav_record(out)
```